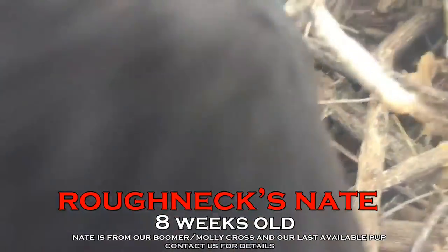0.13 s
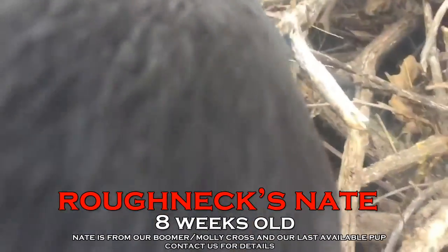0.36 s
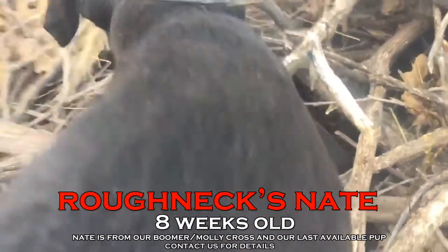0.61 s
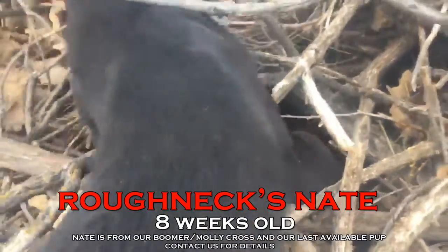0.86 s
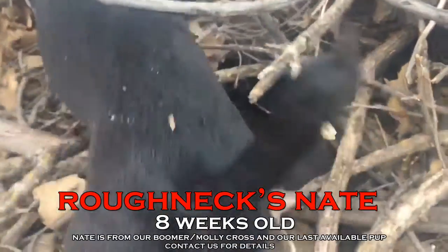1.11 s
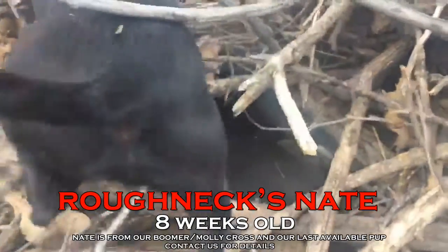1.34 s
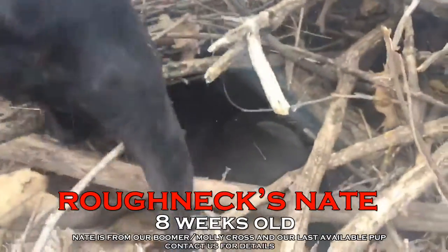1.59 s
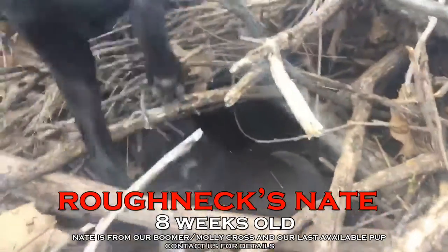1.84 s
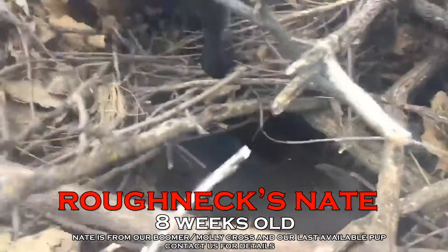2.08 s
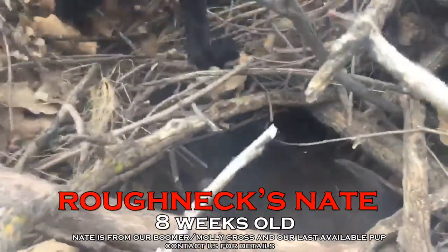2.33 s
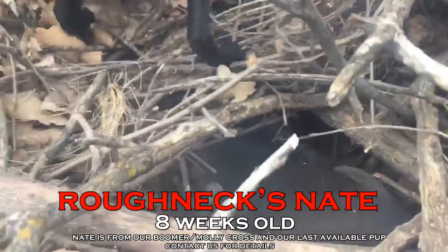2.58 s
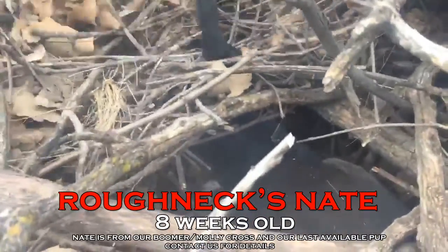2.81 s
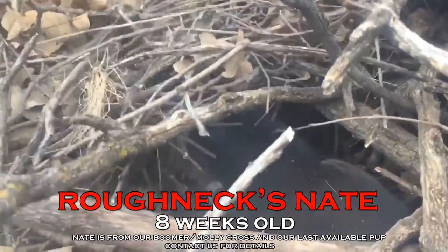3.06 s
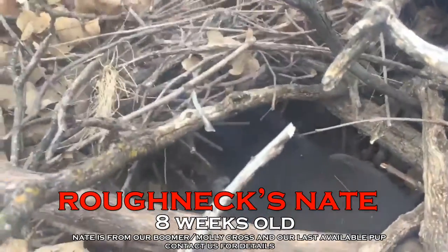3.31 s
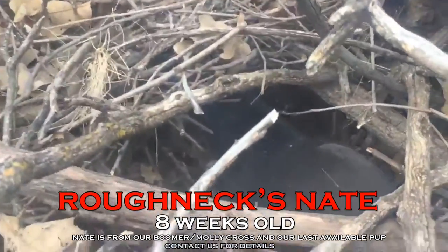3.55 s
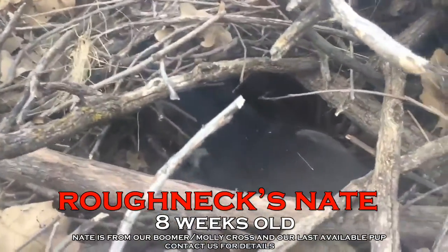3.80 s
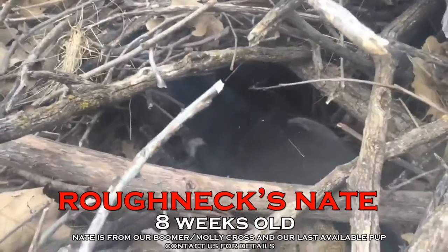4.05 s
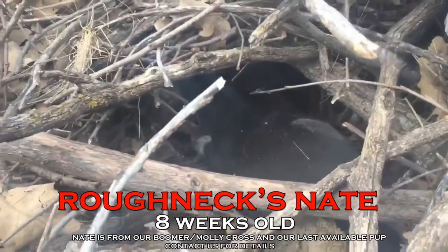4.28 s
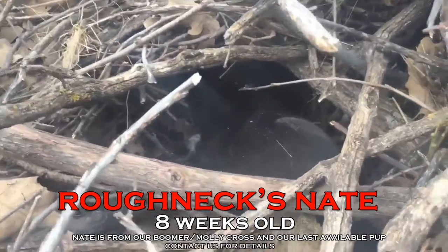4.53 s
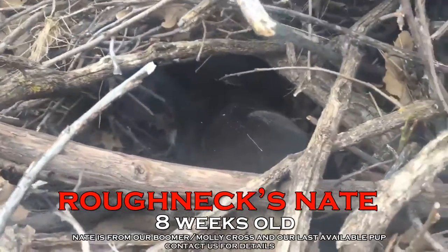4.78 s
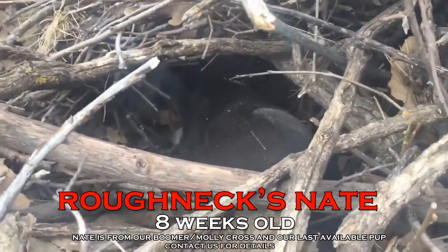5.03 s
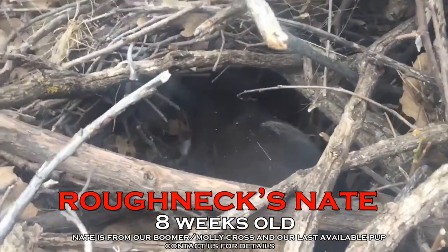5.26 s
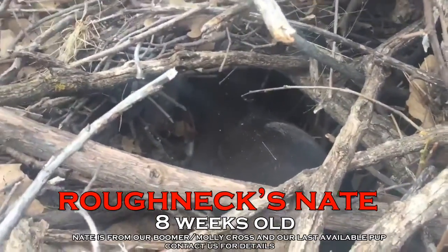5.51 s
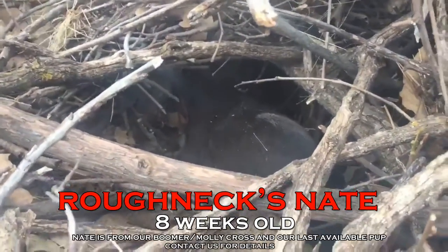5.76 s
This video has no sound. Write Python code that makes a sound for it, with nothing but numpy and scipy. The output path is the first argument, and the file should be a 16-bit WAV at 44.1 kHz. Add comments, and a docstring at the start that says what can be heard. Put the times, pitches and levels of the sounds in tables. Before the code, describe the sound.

Outdoors, a puppy pushes through a brush pile right beside a phone microphone; the sound is dry, close and mono, without echo. A faint, distant low rumble and thin open air lie underneath. Dead leaves start crunching at once and swell into dense, brittle crackle by 0.3-1.4 s, strongest around 0.7-0.8 s, peppered with sharp twig snaps. Near 1.6 s the leaves ease, but two very hard, bright cracks break out almost together. From 2.1 to 2.3 s comes another loud crush with a cluster of snaps, then dull woody knocks on thick branches at about 2.5 s. It dips briefly around 2.7-2.9 s, surges again at 3.2 s, and a crisp snap lands at 3.9 s, with a woody knock near 4.1 s. Afterwards the rustle is mostly weak and patchy, nearly hushed around 5 s, with scattered small snaps and light stirrings near 4.9, 5.4 and 5.6 s to the end.

```python
"""A puppy pushes through a brush pile outdoors, close to a phone microphone.
From the start: a low distant rumble and faint outdoor air (filtered noise), and dead leaves
crushed in dense crackle (thousands of tiny cracks). Twigs snap (noise bursts with a ring) from
the first tenth of a second, hardest near 1.6 s; paws and body soon knock thicker branches
(decaying sines with grit). After about 4.1 s the crush is mostly weaker and snaps are sparser."""
import sys
import numpy as np
from scipy import signal
from scipy.fft import rfft, irfft
from scipy.io import wavfile
from scipy.ndimage import uniform_filter1d

SR = 44100
rng = np.random.default_rng(int(sys.argv[2]) if len(sys.argv) > 2 else 0)


def materialize(psi):
    """Save the field psi as 16-bit PCM at rate SR to the path in sys.argv[1].

    A 1-D psi becomes a single channel; in a 2-D psi each row is a channel.
    """
    bounded = np.clip(np.atleast_2d(psi).T, -1, 1)
    quanta = np.round(bounded * 32767).astype(np.int16)
    wavfile.write(sys.argv[1], SR, quanta)


def gain_from_db(level_db):
    """Turn a decibel level (scalar or array-like) into a linear amplitude factor."""
    decades = np.asarray(level_db, float) / 20
    return 10 ** decades


N = 259308

# slow swell of the rumble: time_s, level_db
RUMBLE_SWELL = [(0, -45.5), (.75, -51), (1.8, -43.5), (3.2, -46.5), (4.0, -43), (5.2, -46.5), (5.88, -43.5)]
# rumble spectrum: freq_hz, relative_density_db
RUMBLE_SPECTRUM = [(12, -49), (20, -33), (35, -13.5), (59, -0.5), (76, 4), (88, -1), (110, -3), (121, -2.5),
                   (130, -42), (200, -22.5), (250, -27), (320, -51), (550, -120)]
# outdoor air spectrum: freq_hz, relative_density_db
AIR_SPECTRUM = [(88, -26), (150, -2), (269, -11.5), (346, -11), (463, -12.5), (562, -9), (1010, -21),
                (1270, -39.5), (15600, -47)]
# crushed leaf spectrum: freq_hz, relative_density_db
LEAF_SPECTRUM = [(88, -17), (150, -6.5), (209, -6), (253, -7), (608, -7.5), (813, -13), (1270, -5),
                 (1740, -4.5), (3230, -2.5), (4860, -3.5), (5680, -1), (13400, -10), (15600, -16)]
# steady stirring of the pile: time_s, level_db, coarseness_db
STIRRING = [(0, -32.5, 3), (.4, -54, -3), (1.0, -41, 7), (1.5, -31, 0), (1.72, -37.5, 2), (2.1, -34, -1.5),
            (2.8, -49, 1.2), (3.3, -33, -0.3), (3.85, -34, -2), (4.15, -50, 2), (4.45, -43, -0.5),
            (4.68, -54, 2.5), (5.04, -61.5, 1.5), (5.3, -46, -4), (5.55, -40.5, -1.5), (5.68, -51.5, 1),
            (5.88, -43, -1.5)]
# shoves into the leaves: peak_s, level_db (before crest rounding), rise_s and fall_s (per 10 dB),
# coarseness_db (big leaves +, fine litter -)
LEAF_SHOVES = [(.05, -36.5, .007, .28, 9), (.272, -24, .012, 0.013, -6), (.328, -22.5, 0.17, 0.11, 1.5),
               (.497, -22, 0.042, 0.047, 0), (0.65, -18, 0.065, 0.021, 0.1),
               (0.814, -17.5, 0.079, 0.036, -0.8), (.932, -21.5, 0.084, 0.036, -1.2),
               (1.09, -22, 0.082, 0.061, -0.3), (1.304, -22, 0.2, 0.07, 1), (1.404, -24.5, 0.2, 0.011, 1),
               (1.525, -25.5, 0.0088, .023, 1), (1.62, -27.5, 0.016, 0.016, 7),
               (1.769, -29.5, 0.022, 0.015, 1), (1.904, -29.5, 0.09, 0.28, 0.5),
               (2.095, -25.5, .056, .044, 0.5), (2.154, -22.5, 0.0065, .087, -1.5),
               (2.275, -16.5, 0.026, 0.097, -2), (2.482, -25.5, .031, 0.17, -1.5),
               (2.627, -25.5, 0.0064, .041, -2), (2.745, -30.5, 0.031, 0.039, -0.5),
               (2.932, -28.5, .173, 0.075, 0.2), (3.055, -22, 0.048, 0.062, -1.8),
               (3.12, -25, 0.043, 0.026, -1.2), (3.214, -17.5, 0.025, 0.045, -1),
               (3.419, -26.5, 0.19, 0.022, -3), (3.555, -27, .074, 0.15, -2.3),
               (3.673, -29, 0.03, 0.067, -3), (3.917, -25, 0.021, 0.022, -2.5),
               (4.104, -31.5, 0.17, 0.035, -2), (4.205, -39, 0.01, .08, -2.2), (4.296, -35, 0.18, 0.031, 0),
               (4.721, -41, 0.023, 0.019, -0.5), (4.859, -37.5, 0.037, 0.051, -2.2),
               (4.915, -35.5, 0.01, 0.029, 4.5), (5.137, -46, 0.035, 0.04, 2),
               (5.374, -35.5, 0.025, 0.04, -1.5), (5.424, -28.5, 0.011, 0.048, -2),
               (5.776, -34.5, 0.052, 0.033, -0.7)]
# twig snaps: start_s, peak_db, ring_hz, t60_s
TWIG_SNAPS = [(.055, -16, 1560, 0.053), (.1244, -19, 2430, .022), (0.196, -8, 5500, 0.02),
              (.2737, -10.5, 5370, 0.028), (.305, -14, 4500, .04), (.429, -12, 4270, 0.032),
              (.5063, -15, 2740, .019), (0.692, -23, 2620, .009), (.7529, -14, 2580, 0.027),
              (.7989, -13, 3700, 0.077), (.8267, -12.5, 3270, 0.068), (.915, -13, 2700, 0.012),
              (1.0267, -12, 2110, 0.069), (1.0373, -12, 5900, .009), (1.2098, -16, 3180, 0.054),
              (1.2905, -10.5, 6100, 0.046), (1.3326, -15, 2450, .022), (1.3697, -11, 3730, .04),
              (1.406, -10, 6840, 0.017), (1.514, -10.5, 5320, 0.037), (1.5255, -11, 3400, 0.014),
              (1.5819, -1.5, 6120, 0.022), (1.6124, -.6, 5360, 0.018), (1.6451, -14, 6480, 0.0063),
              (1.6835, -17, 2410, .012), (1.8453, -19, 2600, .013), (2.0117, -10, 6400, 0.06),
              (2.09, -10, 6540, 0.029), (2.15, -12.5, 3120, 0.042), (2.1622, -5, 5560, 0.016),
              (2.219, -9.5, 4800, 0.026), (2.2381, -13, 6800, .028), (2.2628, -8, 4340, 0.091),
              (2.2746, -7, 4130, 0.069), (2.5565, -13, 5640, .03), (2.5796, -14, 6700, 0.023),
              (2.714, -18, 2320, 0.022), (2.735, -15, 5770, 0.058), (2.8475, -15, 6440, .02),
              (2.863, -14, 5900, .007), (2.923, -14, 6040, 0.039), (2.9847, -11, 3870, 0.016),
              (3.236, -10, 5770, .008), (3.4156, -15, 6040, 0.043), (3.5926, -16, 5810, .011),
              (3.907, -6, 5800, .013), (4.0105, -17, 2370, 0.0054), (4.066, -22, 1210, .015),
              (4.0945, -16.5, 1090, 0.03), (4.198, -35, 7000, .02), (4.841, -18, 7540, .022),
              (4.8616, -25, 8300, .047), (4.904, -21, 1830, 0.078), (4.9045, -26, 3900, .06),
              (4.916, -23.5, 2120, 0.034), (5.1282, -31.5, 2480, 0.014), (5.2624, -18, 4600, 0.019),
              (5.6106, -17, 1900, 0.016), (5.6104, -15.5, 6500, .018), (5.725, -27, 3790, .026)]
# knocks on thick branches and ground: start_s, peak_db, thud_hz
BRANCH_KNOCKS = [(0.255, -25, 167), (1.019, -25.5, 224), (1.579, -21, 594), (2.087, -17.5, 342),
                 (2.265, -21, 345), (2.469, -17, 212), (2.479, -20, 184), (2.487, -14.5, 160),
                 (2.497, -21, 143), (2.507, -24, 143), (2.527, -20, 570), (2.624, -27.5, 194),
                 (3.207, -17.5, 550), (4.067, -19.5, 238), (4.09, -13.5, 444), (4.095, -20.5, 200),
                 (4.209, -26.5, 202), (4.408, -31.5, 175), (4.903, -27, 610), (4.913, -31, 377),
                 (5.412, -36, 570)]
# modes of a thick branch: ring_hz, relative_level_db, t60_s
BRANCH_MODES = [(646, -10, 0.011), (1263, 4, 0.012), (2060, -7, .015)]

BAND_LIMIT_HZ = 15850


def evened(x):
    """Scales to rms 1."""
    return x / np.sqrt(np.mean(x ** 2) + 1e-20)


def read(points, hz):
    """Spectrum value at hz, interpolated over log frequency."""
    f, value = np.transpose(points)
    return np.interp(np.log(hz + 1), np.log(f + 1), value)


def add(mix, start_s, sound):
    """Mixes a sound in at start_s."""
    part = mix[round(start_s * SR):][:len(sound)]
    part += sound[:len(part)]


def colour(x, points):
    """Filters by a spectrum to rms 1; the last point but one is held up to the band limit."""
    hz = np.fft.rfftfreq(len(x), 1 / SR)
    gain = gain_from_db(read(points[:-1], hz)) * (hz < BAND_LIMIT_HZ)
    return evened(irfft(rfft(x) * gain, len(x)))


def ring(x, hz, width_hz):
    """One two-pole resonance of a light, damped body."""
    r = np.exp(-np.pi * width_hz / SR)
    return signal.lfilter([1, 0, -1], [1, -2 * r * np.cos(2 * np.pi * hz / SR), r * r], x)


def wander(top_hz):
    """Slow random curve of rms 1: noise low-passed at top_hz."""
    return evened(signal.lfilter(*signal.butter(2, top_hz, fs=SR), rng.standard_normal(N)))


def background(air_mean_db=-56, gust_rms_db=2.5, gust_top_hz=2.9):
    """Lumpy low rumble and faint, slowly gusting air: two coloured noises with moving levels."""
    time_s, level_db = np.transpose(RUMBLE_SWELL)
    rumble_db = np.interp(np.arange(N) / SR, time_s, level_db)
    rumble = gain_from_db(rumble_db) * colour(rng.standard_normal(N), RUMBLE_SPECTRUM)
    air_db = air_mean_db + gust_rms_db * wander(gust_top_hz)
    air = gain_from_db(air_db) * colour(rng.standard_normal(N), AIR_SPECTRUM)
    return rumble + air


def shoving(t, crest=0.21):
    """Crush level and mean coarseness in dB: stirring plus every shove, summed as power."""
    peak_s, level_db, rise_s, fall_s, coarse_db = np.transpose(LEAF_SHOVES)[:, :, None]
    before = (peak_s - t) / np.maximum(rise_s, .004)
    after = (t - peak_s) / np.maximum(fall_s, .004)
    distance = np.where(t < peak_s, before, after)
    # crest: share of rise and fall rounded off at the peak
    shoves = gain_from_db(level_db - 10 * np.hypot(distance, crest)) ** 2
    time_s, stir_db, stir_coarse_db = np.transpose(STIRRING)
    stir = gain_from_db(np.interp(t, time_s, stir_db)) ** 2
    power = shoves.sum(0) + stir
    coarse = (shoves * coarse_db).sum(0) + stir * np.interp(t, time_s, stir_coarse_db)
    return 10 * np.log10(power), coarse / power


def leaf_cracks(cracks_per_s=2600, spread_db=2.5, crack_t60_s=.008):
    """Tiny breaks of many leaves: random impulses, each exciting a short burst at its leaf's pitch."""
    size = gain_from_db(spread_db * np.minimum(rng.exponential(1, N), 4.8))
    size = size * (rng.random(N) < cracks_per_s / SR)
    pitches_hz = np.geomspace(700, 13000, num=24)
    leaf = rng.integers(0, len(pitches_hz), N)
    t, cracks = np.arange(512) / SR, np.zeros(N)
    for k, hz in enumerate(pitches_hz):
        burst = rng.standard_normal(len(t)) * gain_from_db(-60 * t / crack_t60_s)
        crack = evened(0.6 * evened(burst) + evened(ring(burst, hz, 0.3 * hz)))
        cracks += signal.oaconvolve(size * (leaf == k), crack)[:N]
    return evened(signal.lfilter([1, .3], [1], cracks))


def leaves(clump_rms_db=0.83, clump_top_hz=43, patch_rms_db=1.43, swish_db=-3):
    """Cracks clumped in time over the swish of fur on leaves, shaped by the crush in time and pitch."""
    bass_hz, bass_follows = 710, 0.8  # low body follows the crush only in part
    fizz_hz, fizz_follows = 10500, 0.87  # so does the finest fizz
    usual_db = -22  # crush level about which both follow
    drive = leaf_cracks() + gain_from_db(swish_db) * rng.standard_normal(N)
    drive = drive * gain_from_db(clump_rms_db * wander(clump_top_hz))
    hz, frame_s, z = signal.stft(colour(drive, LEAF_SPECTRUM), SR, nperseg=256)
    hz = hz[:, None]
    crush_db, coarse_db = shoving(frame_s)
    bass_loss = (1 - bass_follows) / (1 + (hz / bass_hz) ** 4)
    fizz_loss = (1 - fizz_follows) / (1 + (fizz_hz / (hz + 1)) ** 4)
    follows = 1 - bass_loss - fizz_loss
    # big leaves sound low, small ones high
    low = 1 / (1 + (hz / 2500) ** 4)
    high = 1 / (1 + (8000 / (hz + 1)) ** 6)
    # random patches, smoothed over 6 frequency bins and 20 frames
    patches = uniform_filter1d(rng.standard_normal(z.shape), 6, 0)
    patches = evened(uniform_filter1d(patches, 20, 1))
    level_db = usual_db + follows * (crush_db - usual_db)
    level_db = level_db + (low - high) * coarse_db + patch_rms_db * patches
    return signal.istft(z * gain_from_db(level_db), SR, nperseg=256)[1][:N]


def snaps(break_db=3.0, break_t60_s=0.0037, tail_db=-11, tail_times=3, attack_s=0.00022):
    """A sharp break, a burst of splintering with a short ring of the twig, then debris settling."""
    # harder breaks and thinner twigs carry more treble
    top_db, top_per_db, top_db_per_octave = -1.5, 0.2, 3
    out, t = np.zeros(N), np.arange(6000) / SR
    noises = rng.standard_normal((len(TWIG_SNAPS), len(t)))
    for (start_s, peak_db, hz, t60_s), noise in zip(TWIG_SNAPS, noises):
        edge_hz = min(2.16 * hz, 9500)  # thick twigs are dull, thin ones bright
        body = signal.lfilter(*signal.butter(3, [0.28 * edge_hz, edge_hz], "band", fs=SR), noise)
        top = signal.lfilter(*signal.butter(2, edge_hz, "high", fs=SR), noise)
        tone = evened(body) + 0.53 * evened(ring(noise, hz, 0.042 * hz))
        t60_s = max(t60_s, .004)
        sharp_break = gain_from_db(break_db - 60 * t / break_t60_s)
        splinter = gain_from_db(-60 * t / t60_s)
        debris = gain_from_db(tail_db - 60 * t / (tail_times * t60_s))
        envelope = (1 - np.exp(-t / attack_s)) * (sharp_break + splinter + debris)
        treble_db = top_db + top_per_db * peak_db + top_db_per_octave * np.log2(hz / 5000)
        snap = envelope * (evened(tone) + gain_from_db(treble_db) * evened(top))
        add(out, start_s, gain_from_db(peak_db) * snap / np.max(abs(snap)))
    return out


def knocks(thud_cycles=9, grit_db=-11, grit_t60_s=0.12, wood_db=-2.5, attack_s=0.00023):
    """A dull low push, the short ring of a thick branch and a gritty scrape."""
    out, t = np.zeros(N), np.arange(6000) / SR
    grit_band = signal.butter(2, [150, 1800], "band", fs=SR)
    wood = sum(gain_from_db(db - 60 * t / t60_s) * np.sin(2 * np.pi * hz * t)
               for hz, db, t60_s in BRANCH_MODES)
    noises = rng.standard_normal((len(BRANCH_KNOCKS), len(t)))
    for (start_s, peak_db, hz), noise in zip(BRANCH_KNOCKS, noises):
        # soft ground damps every thud by 60 dB in as many cycles
        thud = gain_from_db(-60 * t * hz / thud_cycles) * np.sin(2 * np.pi * hz * t)
        scrape = gain_from_db(grit_db - 60 * t / grit_t60_s) * evened(signal.lfilter(*grit_band, noise))
        knock = (1 - np.exp(-t / attack_s)) * (thud + gain_from_db(wood_db) * wood + scrape)
        add(out, start_s, gain_from_db(peak_db) * knock / np.max(abs(knock)))
    return out


def scene():
    """Everything, dry and close, in one channel."""
    return (background() + leaves() + snaps() + knocks())[None]


def top_cut(x):
    """Nothing passes above the cut-off."""
    return signal.sosfilt(signal.butter(12, 16990, fs=SR, output="sos"), x)


def record(dry):
    """The band limit: a linear-phase low-pass, above which the scene holds nothing."""
    low_pass = signal.firwin(255, BAND_LIMIT_HZ, window=("kaiser", 6), fs=SR)
    limited = signal.oaconvolve(dry, low_pass[None], "same")
    return top_cut(limited)


dry = scene()
out = record(dry)
materialize(out)
```